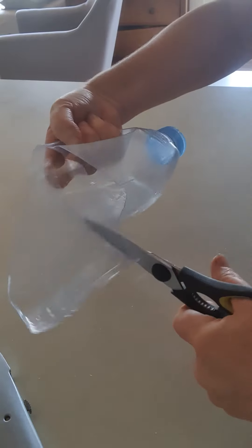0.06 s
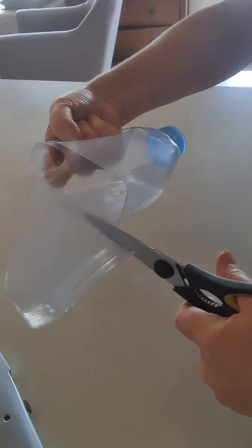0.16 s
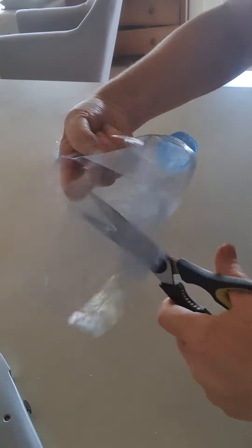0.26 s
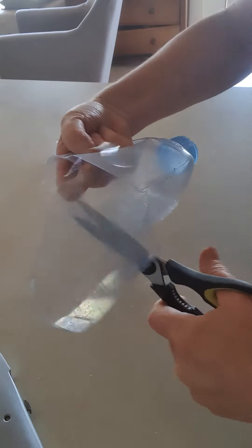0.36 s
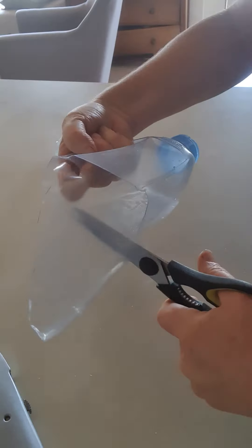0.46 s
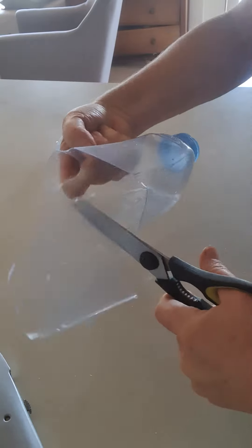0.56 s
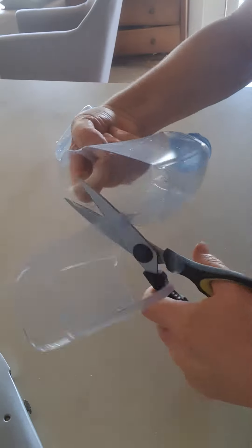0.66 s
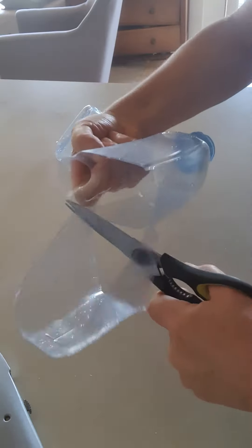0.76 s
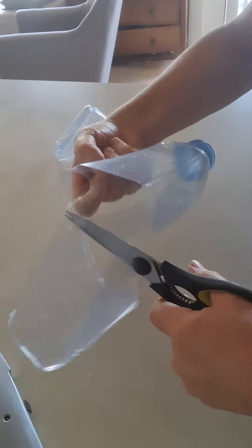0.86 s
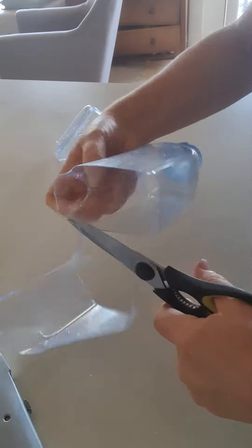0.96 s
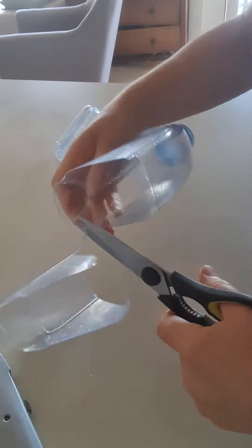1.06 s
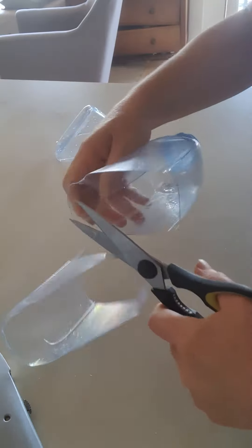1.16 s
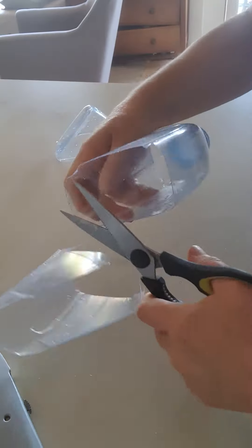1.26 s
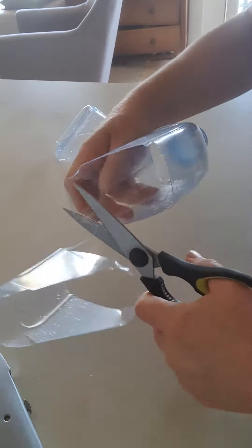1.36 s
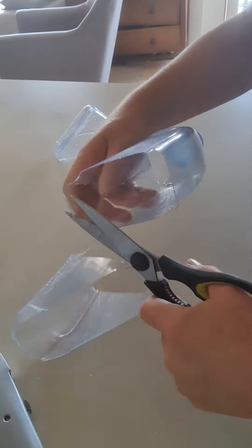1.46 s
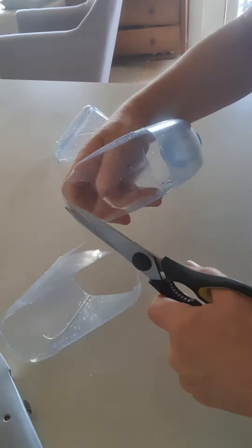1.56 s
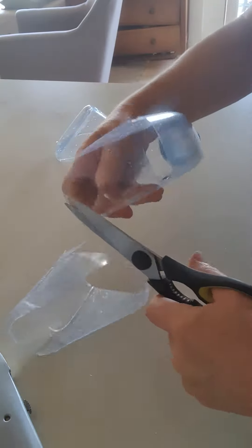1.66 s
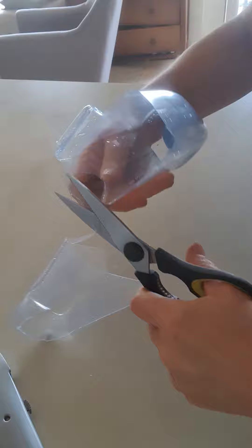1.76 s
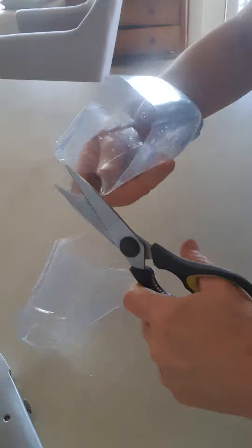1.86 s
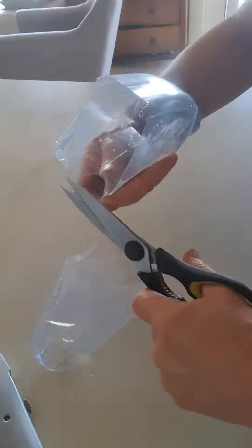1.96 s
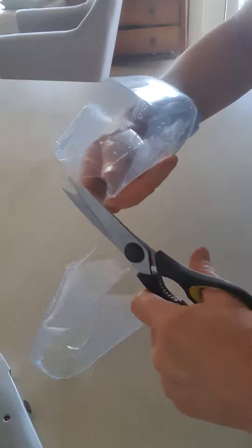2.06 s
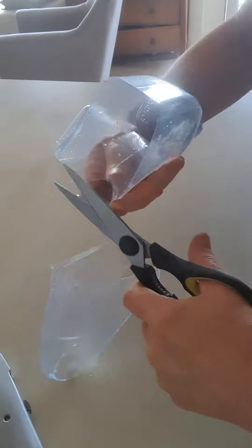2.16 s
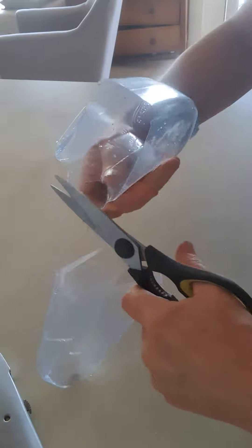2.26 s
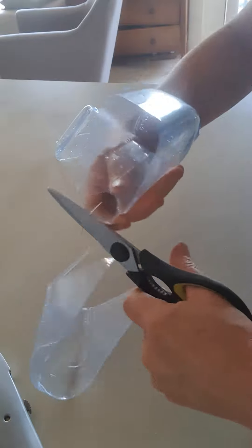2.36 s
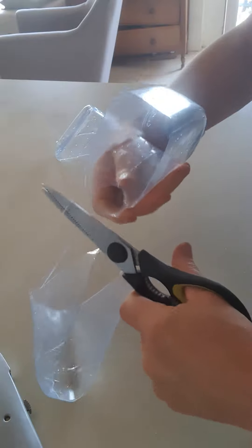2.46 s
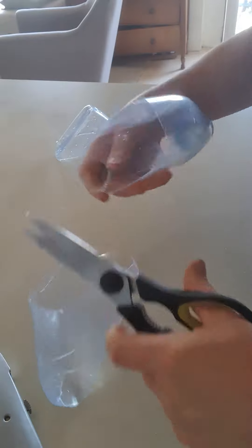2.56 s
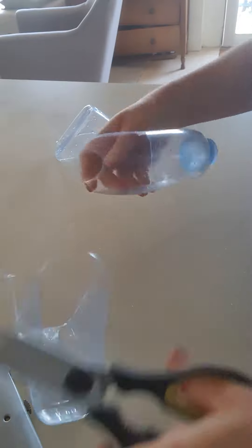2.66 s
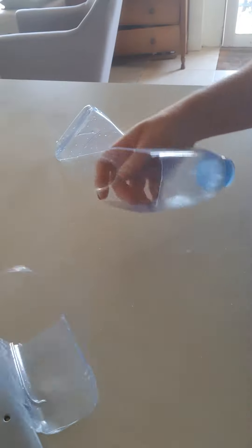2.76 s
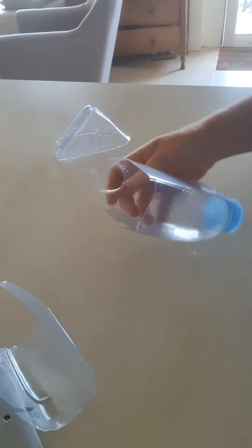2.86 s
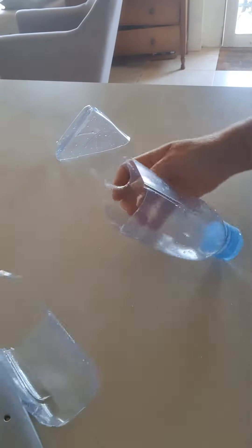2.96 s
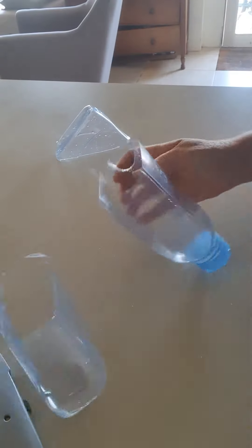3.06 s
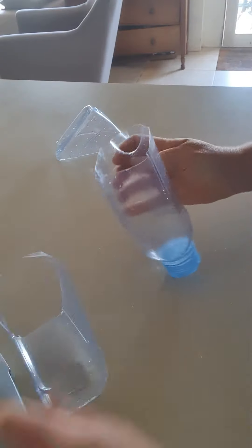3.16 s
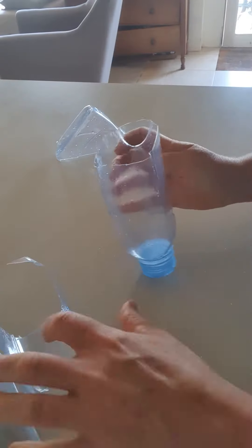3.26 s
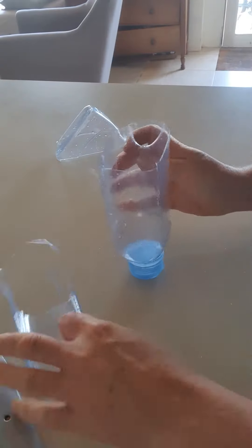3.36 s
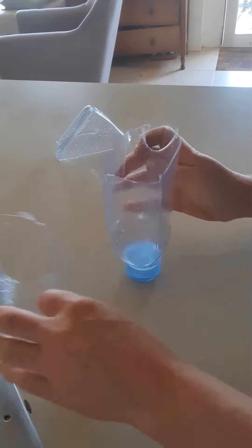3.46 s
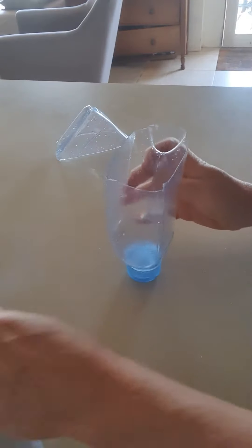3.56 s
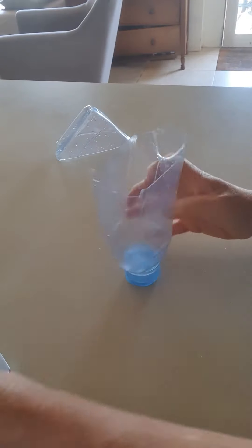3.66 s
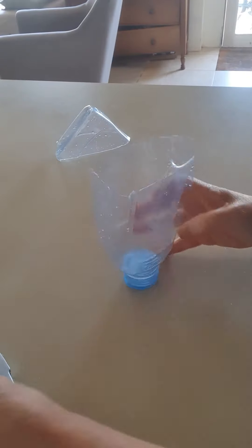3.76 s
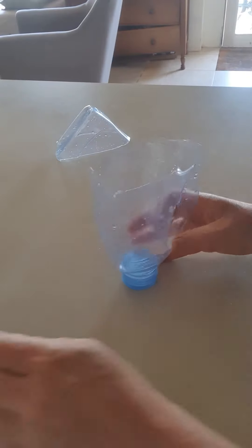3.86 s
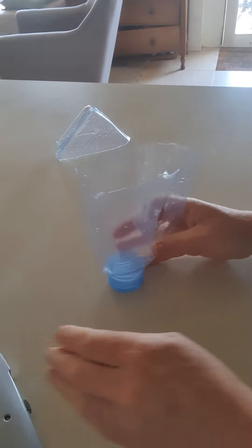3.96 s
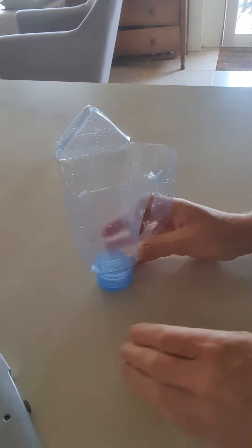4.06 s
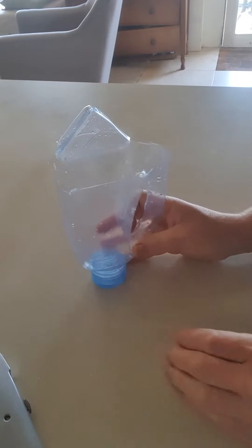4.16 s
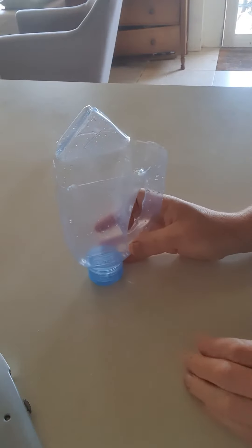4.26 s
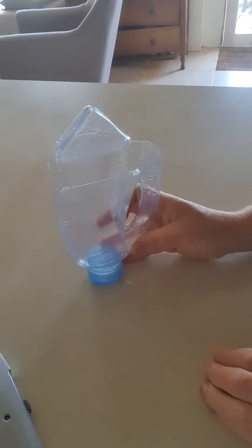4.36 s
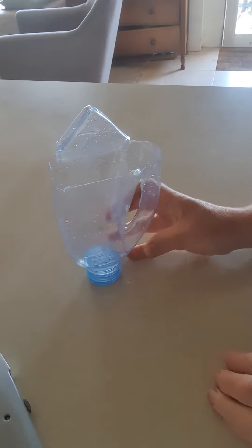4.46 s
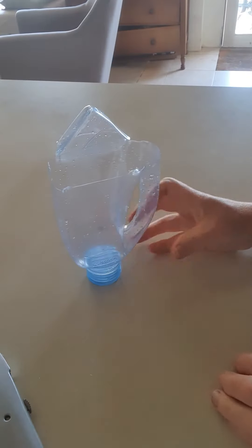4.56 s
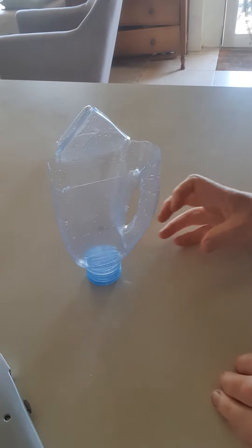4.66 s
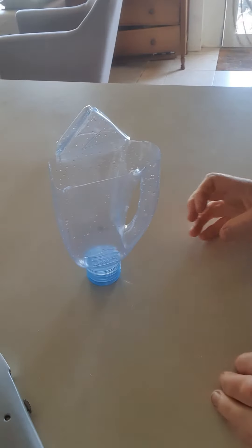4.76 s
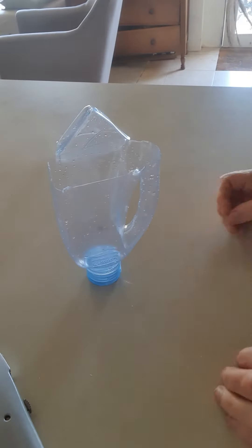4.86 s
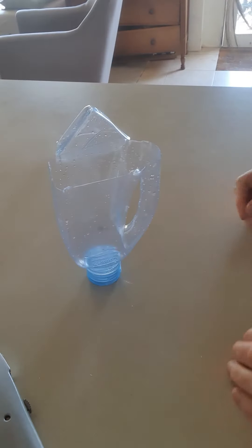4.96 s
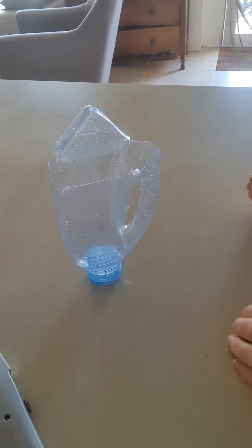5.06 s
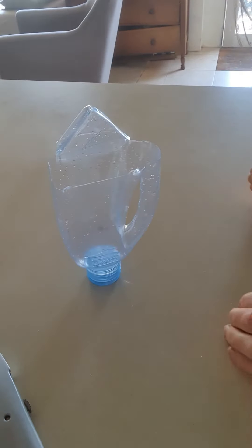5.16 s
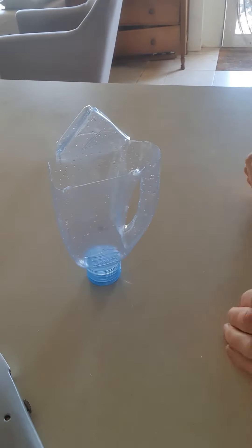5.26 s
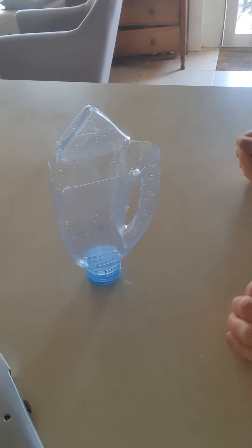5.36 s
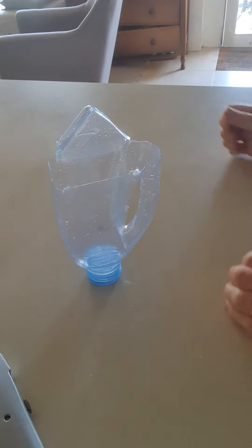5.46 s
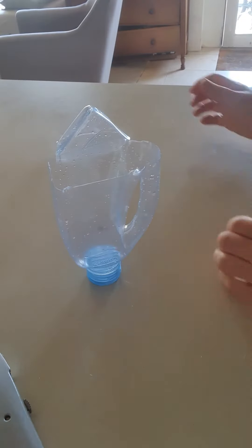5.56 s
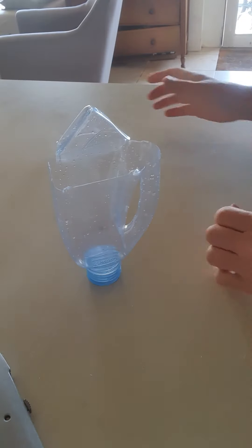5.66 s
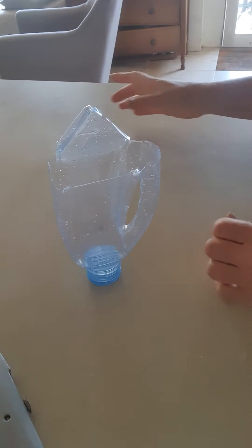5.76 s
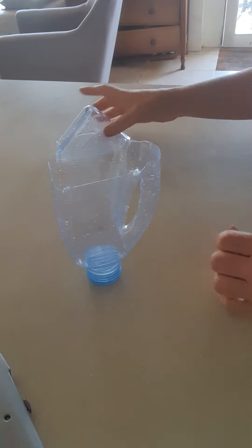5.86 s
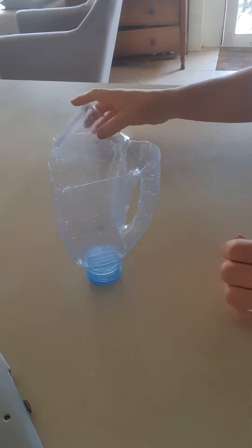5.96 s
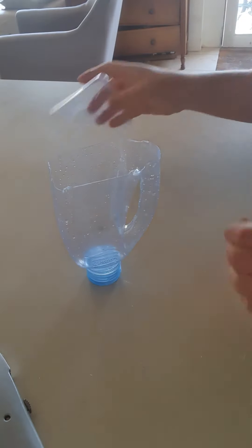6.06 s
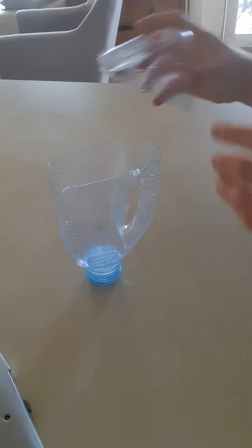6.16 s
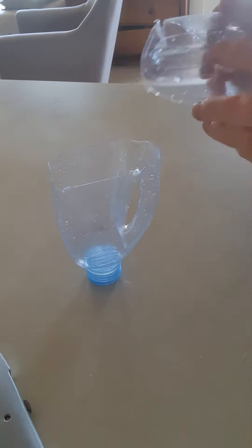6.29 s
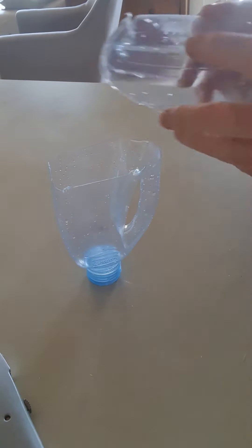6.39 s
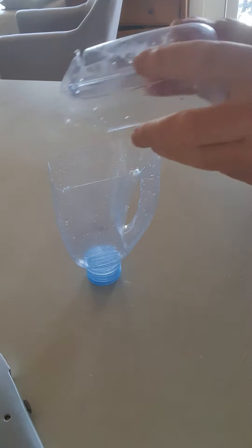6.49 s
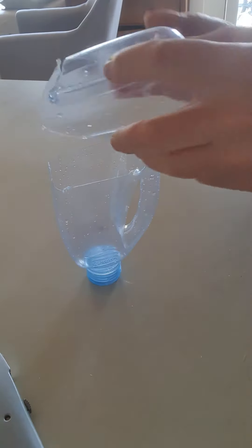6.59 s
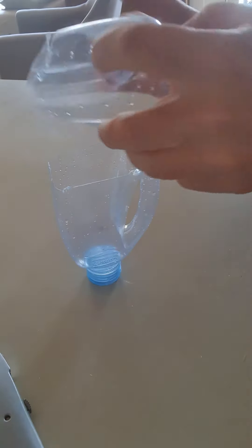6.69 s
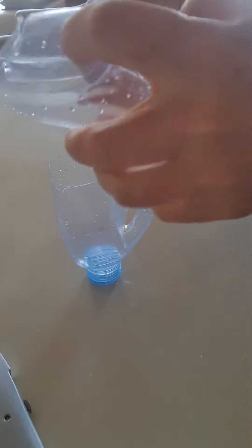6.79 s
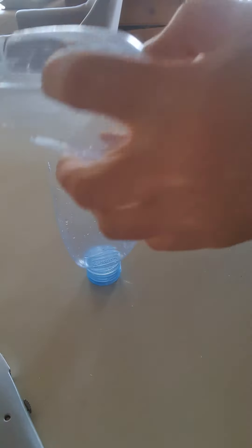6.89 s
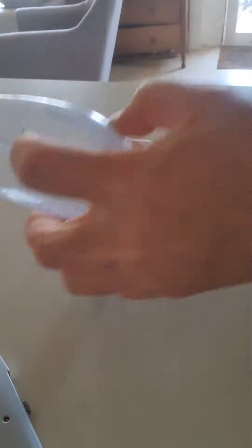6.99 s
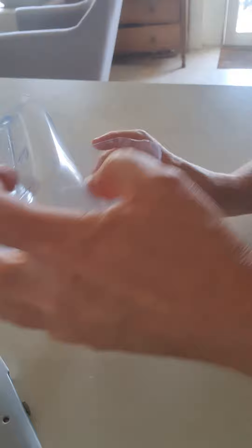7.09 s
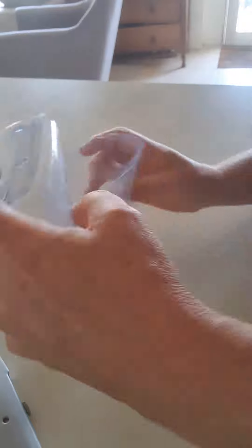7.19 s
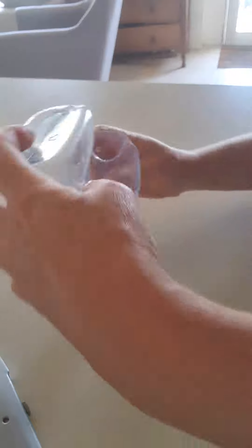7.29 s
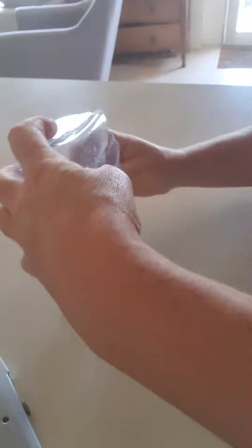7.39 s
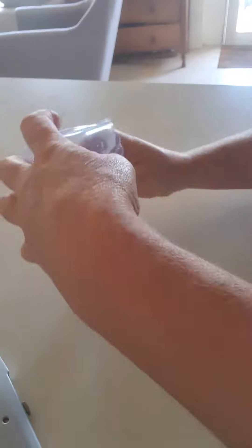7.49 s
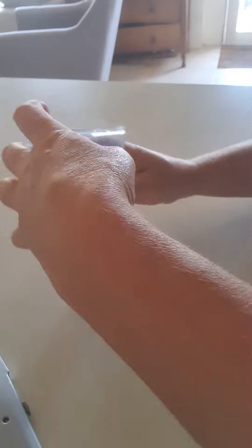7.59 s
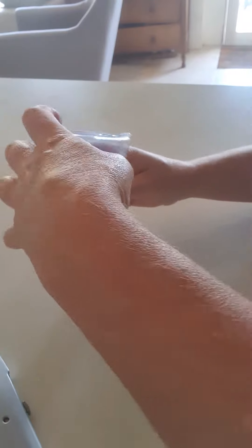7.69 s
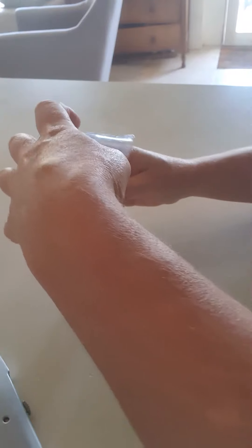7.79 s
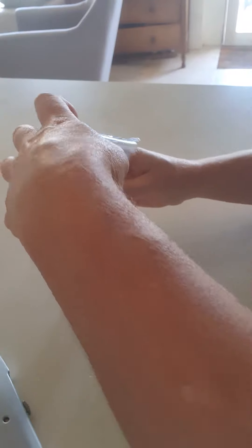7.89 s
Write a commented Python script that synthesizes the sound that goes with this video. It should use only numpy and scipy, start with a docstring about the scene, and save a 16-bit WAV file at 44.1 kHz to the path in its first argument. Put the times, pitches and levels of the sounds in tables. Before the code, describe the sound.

Close up in a small live room, scissors shear a thin plastic bottle in bursts of crackle, hollow pops and sharp ticks, gradually thinning out. The cut piece knocks and rattles on a tabletop, the other piece is set down with a few taps, then near quiet. Light touches follow, and finally plastic is bent by hand with dull pops. A very faint distant engine hums underneath.

```python
"""Scissors cut through a thin plastic bottle above a table, close to the microphones, in a small live room.
Each cut is a swell of tiny fractures that ends in snaps: hollow wall ring, panel crack and very short tick.
Panels pop through as short decaying sines; the offcut falls and bounces on the table in damped knocks
and noise-burst clicks, then the pieces are set down, picked up and bent by hand.
A distant engine drones underneath as two sines, with a rumble, a faint hiss and the room's air."""
import sys
import numpy as np
from scipy import signal
from scipy.fft import rfft, irfft, next_fast_len
from scipy.io import wavfile

SR = 44100
rng = np.random.default_rng(int(sys.argv[2]) if len(sys.argv) > 2 else 0)


def master_out(mix):
    """Clip the mix to full scale and print it as 16-bit PCM to the path in sys.argv[1]."""
    frames = np.transpose(np.atleast_2d(mix))
    ceiling = np.clip(frames, -1, 1)
    pcm = np.round(ceiling * 32767).astype(np.int16)
    wavfile.write(sys.argv[1], SR, pcm)


N = 349713

# the engine's deep note [start_s, level_db]
DRONE_LEVEL = [(1.5, -54), (3.5, -65.5), (3.9, -58), (5.7, -59), (6, -50.5), (7.1, -49), (7.3, -43)]
DRONE_HZ, OVERTONE_HZ = 52.4, 130.5
# a rumble whose pitch wanders, mostly downwards [start_s, pitch_hz, level_db]
RUMBLE_COURSE = [(0, 90, -54.5), (1.5, 97.2, -64.5), (2.7, 71.98, -56.5), (3.9, 69.75, -58.5),
                 (4.5, 63.25, -56.5), (7.9, 66.04, -62.5)]
# a faint high hiss while the hands withdraw [start_s, level_db] and its spectrum [frequency_hz, relative_db]
HISS_LEVEL = [(4.5, -100), (4.58, -61.5), (4.85, -61.5), (5.25, -76), (5.35, -63.5), (5.48, -86.5)]
HISS_SPECTRUM = [(2000, -35.5), (4000, -23), (5600, -3), (8400, -5.5), (13800, 3.5), (16000, -4)]
# spectrum of the room's air [frequency_hz, relative_db]
AIR_SPECTRUM = [(20, -11), (55, -4), (90, -9.5), (170, -12), (400, -25.5), (900, -30.5), (2000, -35.5),
                (4500, -39), (7000, -40), (16000, -42)]
AIR_DB = -66.5

# reverberation time of the room [frequency_hz, t60_s]
ROOM_T60 = [(100, 0.92), (1400, 0.37), (3700, 0.38), (9700, 0.19), (16000, 0.42)]
# resonances that the bottle and the blades lend to every fracture [pitch_hz, width_hz, gain_db]
BODY_RESONANCES = [(350, 20, 3), (653.8, 10, 4.5), (2230, 72, 4.5), (7560, 270, -0.5)]
# where the plastic is [start_s, left_delay_ms, left_right_db]
PLASTIC_PLACE = [(.3, 0.0077, 1), (1.1, 0.137, 0), (2.2, -0.08, 1), (2.3, -0.532, 1.5), (2.6, 0.0495, 0.5),
                 (2.9, 0.03, -0.5), (2.97, 0.305, -2.5), (3.28, 0.3, -3), (3.65, 0.25, -1.5), (4.8, 0.2, 0),
                 (6.3, -0.261, 3.5), (7.66, -0.232, -2)]
# response of the microphones in their housing [frequency_hz, gain_db, left_right_db]
MICROPHONE_PORTS = [(300, 0, -0.5), (510, 1, -1), (850, -1, -1.5), (1300, 1, 1), (2780, -2.5, 0.5),
                    (5000, 1.5, 2), (9880, 0.5, -1.5), (13580, -5, 2.5)]
EDGE_HZ = 16300  # upper band limit of the microphones

# the whole bottle flexes, or something bumps the table [start_s, level_db, pitch_hz]
FLEX_THUDS = [(.008, -35, 134.3), (0.724, -32.5, 94.4), (0.755, -30.5, 88.7), (2.295, -39.5, 94.7),
              (2.923, -32.5, 120.5), (3.004, -35.5, 137), (3.053, -31, 173.4), (3.103, -33, 155.4),
              (3.199, -40.5, 151), (3.685, -43.5, 150.5), (7.094, -41.5, 94.4), (7.329, -42, 164.5)]
# a stiff edge knocks on the table and swings a few times [start_s, level_db, pitch_hz]
EDGE_KNOCKS = [(2.92, -16, 835), (2.9507, -22.5, 890), (3.057, -33.5, 600)]
# a cut edge clicks on the table as the offcut tumbles [start_s, level_db, pitch_hz]
EDGE_CLICKS = [(2.92, -35.5, 3000), (2.967, -21.5, 7200), (3.0031, -23, 7147), (3.0247, -22, 6750),
               (3.0387, -28.5, 7500), (3.0642, -18.5, 6000), (3.085, -21.5, 7000), (3.1238, -26, 5900),
               (3.1988, -23.5, 6800), (3.2063, -29.5, 5440), (3.287, -36, 5770)]
# a panel of the wall pops through with a short clear note
# [start_s, level_db, pitch_hz, rise_s, decay_s, left_right_db]
PANEL_POPS = [(0.006, -19.5, 670, 0.00035, 0.0077, -8), (0.009, -16.5, 371, 0.0011, 0.012, -2),
              (0.014, -22.5, 490, 0.00064, 0.0043, 1.5), (0.203, -29.5, 647, 0.003, 0.0094, -12.5),
              (0.231, -28.5, 1452, 0.0051, 0.0092, -6.5), (0.236, -30, 557, 0.001, 0.0066, -1),
              (0.265, -23.5, 945, 0.005, 0.0066, 10.5), (0.372, -31, 980, 0.001, 0.005, 9),
              (0.439, -32, 330, 0.0046, 0.012, 0), (0.617, -25.5, 500, 0.0056, 0.0056, -0.5),
              (0.628, -30, 379, 0.00088, 0.0074, -2.5), (0.725, -26.5, 347, 0.005, 0.0098, 4),
              (0.749, -32.5, 344, 0.006, 0.008, 2.5), (0.979, -38.5, 1516, 0.0011, 0.0057, 2.5),
              (0.981, -31, 550, 0.00079, 0.0027, -1.5), (1.094, -31, 567, 0.0008, 0.011, 0),
              (1.095, -24.5, 781, 0.006, 0.0094, -6), (1.097, -26.5, 441, 0.0074, 0.013, 1),
              (1.135, -28.5, 775, 0.006, 0.008, -5), (1.158, -28, 406, 0.006, 0.008, 0.5),
              (1.449, -29, 1154, 0.001, 0.0074, -5.5), (1.507, -22, 660, 0.0063, 0.01, -19.5),
              (1.519, -29, 2210, 0.001, 0.004, 3.5), (1.522, -24, 370, 0.00087, 0.0063, -2.5),
              (1.54, -27.5, 680, 0.0046, 0.0074, -3), (1.665, -30, 697, 0.0026, 0.014, -0.5),
              (2.265, -41, 460, 0.004, 0.006, 0), (2.298, -34.5, 650, 0.001, 0.004, 2),
              (3.054, -25.5, 574, 0.0026, 0.014, -1.5), (3.104, -28, 595, 0.0072, 0.013, 0),
              (3.691, -29, 646.6, 0.0032, 0.021, -1), (3.812, -31.5, 703, 0.003, 0.014, 3.5),
              (7.094, -40, 1400, 0.001, 0.0044, 16), (7.328, -28.5, 651.3, 0.0009, 0.0027, -19.5),
              (7.432, -24, 490, 0.001, 0.0072, -0.5), (7.439, -28, 564, 0.001, 0.008, 1),
              (7.448, -28, 369, 0.0028, 0.012, -2), (7.462, -25, 507, 0.0011, 0.0063, 5),
              (7.469, -30, 628, 0.003, 0.011, 2), (7.515, -31.5, 540, 0.001, 0.0072, 3.5),
              (7.597, -29, 313, 0.001, 0.0073, 0.5), (7.603, -32, 486, 0.0014, 0.0045, 1.5),]
# under the fingers the bent wall sticks and slips in an even run of pops that swells and fades [pitch_hz]
SLIP_PITCHES = [552, 670]
SLIPS_PEAK_S, SLIP_PERIOD_S, SLIP_DECAY_S = 7.8728, 0.0183, 0.0033
SLIP_DB, SLIP_FADE_DB = -40, 4.28  # peak level; fall per squared step from the peak

# the small offcut's hollow note while it is picked up [start_s, end_s, pitch_hz, width_hz, added_db]
OFFCUT_RING = (5.85, 7.0, 1240, 338, 1)
# the wall's hollow ring follows the size and bend of the piece in play [start_s, pitch_hz, strength_db]
WALL_RING = [(.01, 456, -0.5), (.261, 1019, -7.5), (.44, 319.5, -5.5), (0.619, 480, -3.5), (.75, 345, 0.5),
             (1.1, 474, -6), (1.5, 654, -1.5), (2.1, 528, -7.5), (2.8, 654, -4.5), (3.1, 630, -1.5),
             (3.63, 550, -1), (3.8, 694, -2), (3.95, 517, -4), (4.6, 800, -4.5), (5.93, 551, -9),
             (6.25, 565, -7), (6.9, 560, -11), (7.1, 300, -1.5), (7.35, 664, 0.5), (7.46, 510, -4),
             (7.6, 477, -4), (7.8, 527, -10)]
WALL_SCATTER = 0.03  # random spread of the ring's pitch, as a ratio
# wall ring and tick of a snap and of a stroke of middling sharpness (dB re crack)
SNAP_RING_DB, SNAP_TICK_DB = -4.5, -7
STROKE_RING_DB, STROKE_TICK_DB = 4, -10
# a sharper sound has less wall ring and more tick (dB per dB of sharpness)
RING_FALL, TICK_RISE = 0.55, 0.76
CRACK_RISE = 0.022  # upward shift of the crack's band (octaves per dB of tick)
PANEL_RING = 0.6  # panels' ring beside the dry burst of a fracture (amplitude ratio)

# small random crinkles while the bottle is cut, handled or settling [start_s, end_s, base_level_db]
CRINKLE_SPANS = [(0.203, .53, -48.5), (0.651, 1.301, -47.5), (1.403, 2.449, -48), (2.6, 3.299, -47),
                 (3.697, 4.453, -60.5), (4.898, 5.801, -78)]
CRINKLE_HZ = 2200  # panel resonance of a middling crinkle
# the sheet cracks or buckles [start_s, level_db, panel_hz, sharpness_db]
SHEET_SNAPS = [(0.011, -20, 1267, 0), (0.029, -23.5, 3880, -10.5), (0.1715, -29, 2094, -6),
               (0.216, -25.5, 1907, -4.5), (0.2736, -21, 4940, -1), (0.3301, -33.5, 1178, -3.5),
               (0.37, -30, 1338, -9.5), (0.4601, -30.5, 2250, -2), (0.477, -35, 3810, 8),
               (0.611, -31.5, 1790, -7), (0.6328, -28.5, 3764, 6), (0.7265, -23.5, 1200, 0.5),
               (0.7469, -27, 1430, 8.5), (0.7593, -22, 3580, 3.5), (0.8042, -36.5, 2240, 12),
               (0.8218, -29.5, 2230, -4), (0.871, -40, 1206, 12), (0.912, -37, 1600, -4),
               (0.9773, -34, 1508, -18), (1.0676, -28.5, 1155, -6.5), (1.096, -24, 1650, -9.5),
               (1.1049, -27.5, 1680, -6.5), (1.174, -35, 2130, -4), (1.192, -40.5, 1300, -5),
               (1.2086, -32, 2160, -6), (1.395, -41, 1486, -6), (1.4502, -29, 1192, -9),
               (1.506, -26, 2930, -1), (1.518, -22, 1326, 2.5), (1.6149, -25, 1170, 1.5),
               (1.628, -35.5, 3630, -20.5), (1.685, -38.5, 3710, 7), (1.729, -32.5, 2220, -3),
               (1.863, -42.5, 4670, 1), (1.8812, -36, 2780, -5), (1.9437, -37.5, 3500, -12.5),
               (2.012, -44.5, 3660, -5.5), (2.0514, -38.5, 3440, 0.5), (2.06, -43.5, 1292, 0),
               (2.0912, -33, 1230, -1.5), (2.208, -41, 2153, -9.5), (2.2985, -20, 2954, 3.5),
               (2.624, -38.5, 3680, 12), (2.6411, -35, 1121, 9), (2.674, -40, 3300, 8),
               (2.7367, -32, 3500, 8.5), (2.751, -37, 1900, 5), (2.8279, -34.5, 1830, -6),
               (2.842, -37.5, 1856, -1.5), (3.699, -29.5, 3424, 2), (3.732, -33.5, 2347, -6),
               (4.212, -51, 3144, 3.5), (4.268, -46.5, 2500, -6.5), (4.615, -54, 3300, -0.5),
               (6.2297, -44.5, 1300, -8.5), (6.3119, -51, 1410, -6.5), (6.3926, -48, 1200, -5.5),
               (6.565, -56, 1292, -4.5), (7.0947, -41.5, 1410, -10), (7.227, -52, 1658, -6),
               (7.276, -42, 1660, -10), (7.328, -29, 2720, -4), (7.3643, -34, 1750, -3),
               (7.4307, -28.5, 1260, -13), (7.444, -28.5, 1310, -12.5), (7.5987, -34, 1300, -13.5),
               (7.661, -44, 4670, 13.5)]
# a piece bounces on the table, is set down or is touched [start_s, level_db, panel_hz, sharpness_db]
TABLE_TAPS = [(2.9198, -21.5, 1400, -8), (2.9501, -25, 1300, -15.5), (3.0028, -31, 1240, -7.5),
              (3.025, -25.5, 3550, -2.5), (3.056, -27, 1580, -19.5), (3.0644, -25, 4000, 0.5),
              (3.1056, -31, 1200, -27), (3.1242, -34.5, 1200, -14.5), (3.199, -34, 1900, 6.5),
              (3.2069, -32.5, 3233, -10), (3.617, -54.5, 1400, -32.5), (3.6855, -25.5, 2980, 5),
              (3.7547, -31.5, 3400, 4.5), (3.7921, -24.5, 3370, 4.5), (4.232, -35.5, 3408, -1),
              (4.5489, -42, 2830, -0.5), (4.7926, -53, 3340, 3), (5.768, -67, 3500, 2)]
# the sheet slides, rubs or creases [peak_s, length_s, level_db, panel_hz, sharpness_db]; level before the trim
SHEET_RUBS = [(3.122, .085, -33.5, 1200, -7.5), (3.251, 0.29, -42, 4800, 8),
              (3.63, 0.06, -47.5, 3420, -12.5), (3.696, 0.0559, -30.5, 2990, 7.5),
              (3.819, 0.0889, -31.5, 3260, 9), (3.965, 0.1545, -42, 2600, 4.5),
              (4.175, 0.468, -60, 1800, -3.5), (5.93, 0.0846, -53.5, 1049, -2),
              (6.154, 0.1336, -61, 3700, 12), (6.246, 0.0847, -43.5, 3890, 5.5),
              (6.469, 0.0822, -50.5, 3233, 8), (6.595, 0.26, -55.5, 2440, -1),
              (6.845, 0.32, -73.5, 1300, -16), (7.133, 0.2934, -51, 1600, 1.5),
              (7.367, 0.0952, -37.5, 1740, -4), (7.48, 0.1548, -41, 1400, -7.5),
              (7.594, 0.081, -40, 1300, -4), (7.852, 0.545, -60, 1456, 6)]
RUB_RISE_SHARE = 0.33  # share of a rub's length spent rising
# the held bottle rustles faintly as one long swell
# [peak_s, rise_s, fall_s, level_db, panel_hz, sharpness_db]; level before the trim
BOTTLE_HANDLING = (3, 6, 0.9676, -57, 1997, 9.5)
# a blade shears the sheet [peak_s, rise_s, fall_s, level_db, panel_hz, sharpness_db]; level before the trim
BLADE_CUTS = [(0.014, 0.009, 0.00776, -20.5, 1300, 4), (0.039, 0.00948, 0.047, -35, 1963, 4.5),
              (0.258, 0.0858, 0.02242, -27, 2144, -2.5), (0.445, 0.0624, 0.0228, -44.5, 1043, -17.5),
              (0.628, 0.0516, 0.0122, -33, 1836, 0), (0.734, 0.01098, 0.041, -39.5, 1200, -16.5),
              (0.851, 0.0692, 0.1414, -40.5, 1459, 3.5), (0.99, 0.0488, 0.172, -49, 1480, -10),
              (1.098, 0.019, 0.0148, -25.5, 1675, -3.5), (1.165, 0.062, 0.041, -35, 2122, 10),
              (1.275, 0.02445, 0.0279, -37, 3500, 6), (1.395, 0.016, 0.056, -43, 1460, 0),
              (1.52, 0.0364, 0.02157, -24.5, 1330, 1.5), (1.675, 0.055, 0.062, -37, 2140, -8),
              (2.11, 0.0615, 0.0399, -33.5, 1210, 2), (2.336, 0.00879, 0.082, -33, 3073, 3.5),
              (2.65, 0.0698, 0.1797, -39.5, 1020, 1.5)]
STROKE_TRIM_DB = -1.5  # common trim of cuts, rubs and handling


def gain_of(db):
    """Level definition: an amplitude ratio is ten to the power of dB / 20."""
    return 10 ** (np.asarray(db) / 20)


def unit(x):
    """Energy normalisation: each channel is scaled to energy 1."""
    return x / np.sqrt(np.sum(x ** 2, axis=-1, keepdims=True) + 1e-30)


def evened(x):
    """Power normalisation: each channel is scaled to rms 1."""
    return unit(x) * np.sqrt(x.shape[-1])


def read(points, hz):
    """Spectral interpolation: a value is read linearly along a logarithmic frequency axis."""
    f, value = np.transpose(points)
    return np.interp(np.log(hz + 1), np.log(f + 1), value)


def follow(rows):
    """Slow modulation: each column of a curve is interpolated at every sample."""
    s, *columns = np.transpose(rows)
    return [np.interp(np.arange(N) / SR, s, column) for column in columns]


def add(mix, s, sound):
    """Superposition: a sound is added to the mix from time s."""
    part = mix[:, max(0, round(s * SR)):][:, :sound.shape[1]]
    part += sound[:, :part.shape[1]]


def band(x, lo_hz, hi_hz, order=2):
    """Band limitation by a causal band-pass filter."""
    sos = signal.butter(order, [lo_hz, min(hi_hz, 0.49 * SR)], "band", fs=SR, output="sos")
    return signal.sosfilt(sos, x)


def resonate(x, hz, width):
    """Resonance: a single second-order mode with peak gain 1."""
    b, a = signal.iirpeak(hz, max(hz / width, 1), fs=SR)
    return signal.lfilter(b, a, x)


def noise_pair(count, alike):
    """Partial coherence: two microphones share a fraction of the power of their white noise."""
    shared, *own = rng.standard_normal((3, count))
    alike = np.clip(alike, 0, 1)
    return np.sqrt(alike) * shared + np.sqrt(1 - alike) * np.array(own)


def coloured(points, alike):
    """Spectral shaping: white noise is weighted in frequency to give steady coloured noise."""
    spectrum = rfft(noise_pair(N, alike))
    return evened(irfft(spectrum * gain_of(read(points, np.fft.rfftfreq(N, 1 / SR))), N))


def background(overtone_db=-21, waver_hz=0.25):
    """Sustained sources: a wavering two-tone drone, narrow-band rumble, faint hiss and the room's air."""
    t = np.arange(N) / SR
    knots = np.arange(0, 9, 1 / 24)
    drift, real, imaginary = (np.interp(t, knots, k) for k in rng.standard_normal((3, len(knots))))
    turns = np.cumsum(DRONE_HZ + waver_hz * drift) / SR
    overtone = np.sin(2 * np.pi * turns * OVERTONE_HZ / DRONE_HZ)
    note = np.sin(2 * np.pi * turns) + gain_of(overtone_db) * overtone
    drone = gain_of(follow(DRONE_LEVEL)[0]) * evened(note)
    # a slow random complex envelope on a gliding carrier makes the rumble
    hz, db = follow(RUMBLE_COURSE)
    carrier = np.exp(2j * np.pi * np.cumsum(hz) / SR)
    rumble = gain_of(db) * evened(((real + 1j * imaginary) * carrier).real)
    hiss = gain_of(follow(HISS_LEVEL)[0]) * coloured(HISS_SPECTRUM, alike=0.4)
    air = gain_of(AIR_DB) * coloured(AIR_SPECTRUM, alike=0.33)
    return drone + rumble + hiss + air


def room(x, early_db=-7, late_db=-5, early_s=0.006, build_s=0.005):
    """Reverberation: quick reflections off the table and the hands, then the diffuse tail of a tiled room."""
    t = np.arange(SR * 2 // 3) / SR
    taps = rng.standard_normal((2, len(t))) * (rng.random((2, len(t))) < 0.08)
    early = unit(taps * np.exp(-t / early_s) * (t > 0.002))
    hz, when, z = signal.stft(noise_pair(len(t), 0.034), SR, nperseg=256)
    # the long waves reach both microphones alike
    z = z + (z[::-1] - z) * 0.5 / (1 + (hz[:, None] / 550) ** 4)
    z *= gain_of(-60 * when / read(ROOM_T60, hz)[:, None])
    late = signal.istft(z, SR, nperseg=256)[1][:, :len(t)] * np.clip(t / build_s - 0.5, 0, 1)
    # the tail is normalised by its energy between 1 and 5 kHz
    late = late / np.linalg.norm(band(late, 1000, 5000), axis=1, keepdims=True) * np.sqrt(8000 / SR)
    return signal.fftconvolve(x, gain_of(early_db) * early + gain_of(late_db) * late, axes=1)[:, :N]


def placed(s, pair):
    """Stereo localisation: time and level differences set where the plastic is at time s."""
    when, lag_ms, pan_db = np.transpose(PLASTIC_PLACE)
    lag = round(np.interp(s, when, lag_ms) * SR / 1000)
    sides = gain_of(np.array([[0.5], [-0.5]]) * np.interp(s, when, pan_db))
    delayed = np.array([np.roll(pair[0], max(lag, 0)), np.roll(pair[1], max(-lag, 0))])
    return delayed * sides / np.sqrt(np.mean(sides ** 2))


def thuds(t60=0.11, rough=0.8):
    """Free damped vibration: a low swing decays exponentially with a dull noise puff around it."""
    out, t = np.zeros((2, N)), np.arange(SR // 4) / SR
    for s, db, hz in FLEX_THUDS:
        swing = band(np.sin(2 * np.pi * hz * t) * gain_of(-60 * t / t60), 44, 370)
        puff = band(noise_pair(len(t), 0.94) * np.exp(-t / 0.0089), 69, 210)
        add(out, s, gain_of(db) * np.sqrt(SR / 100) * unit(unit(swing) + rough * unit(puff)))
    return out


def knocks(q=3.5, top_hz=3000):
    """Impulse response of a heavily damped mode: the plastic edge swings alike at both microphones."""
    out, blow = np.zeros((2, N)), signal.unit_impulse(SR // 40)
    for s, db, hz in EDGE_KNOCKS:
        swing = unit(band(resonate(blow, hz, hz / q), 450, top_hz))
        add(out, s, gain_of(db) * np.sqrt(SR / 100) * swing[None])
    return out


def clicks(decay_s=0.0009, rise_s=0.0003, q=5, ring=0.6, lowest_share=0.6):
    """Hard contact: an edge on the table gives a burst of about a millisecond with one high resonance."""
    out, t = np.zeros((2, N)), np.arange(SR // 50) / SR
    for s, db, hz in EDGE_CLICKS:
        envelope = np.exp(-t / decay_s) * (1 - np.exp(-t / rise_s))
        burst = band(noise_pair(len(t), 0.29) * envelope, lowest_share * hz, EDGE_HZ)
        click = unit(unit(burst) + ring * unit(resonate(burst, hz, hz / q)))
        add(out, s, placed(s, gain_of(db) * np.sqrt(SR / 100) * click))
    return out


def pops(bend=0.03, spread=0.23, slip_rise_s=0.00064):
    """Snap-through and stick-slip: panels flip or slip; each note starts a little sharp and dies quickly."""
    out, t = np.zeros((2, N)), np.arange(SR // 8) / SR
    slips = [(SLIPS_PEAK_S + k * SLIP_PERIOD_S, SLIP_DB - SLIP_FADE_DB * k ** 2, hz, slip_rise_s, SLIP_DECAY_S, 0)
             for k in range(-3, 3) for hz in SLIP_PITCHES]
    side = np.array([[1], [-1]])
    for s, db, hz, rise, decay, pan_db in PANEL_POPS + slips:
        fade, sides = np.exp(-t / decay), gain_of(side * pan_db / 2)
        turns = np.cumsum(hz * (1 + bend * (fade - 0.5))) / SR
        swing = np.sin(2 * np.pi * turns + side * spread * rng.standard_normal())
        note = unit(swing * fade * (1 - np.exp(-t / rise)))
        add(out, s, gain_of(db) * np.sqrt(SR / 100) * note * sides / np.sqrt(np.mean(sides ** 2)))
    return out


def body(x):
    """Coupled resonance: the modes of bottle and blades ring on after each fracture."""
    return x + sum((gain_of(db) - 1) * resonate(x, hz, width) for hz, width, db in BODY_RESONANCES)


def small_piece(x):
    """Sympathetic resonance: the small offcut rings along with whatever touches it."""
    start, end, hz, width, db = OFFCUT_RING
    t = np.arange(N) / SR
    return x + gain_of(db) * resonate(x * ((t > start) & (t < end)), hz, width)


def shiver(power, decay_s, alike, rise_s=0.00092):
    """Dense vibration: every fracture starts a noise burst whose energy decays with time constant decay_s."""
    t = np.arange(SR // 25) / SR
    energy = signal.oaconvolve(power, np.exp(-t / decay_s) * (1 - np.exp(-t / rise_s)))[:len(power)]
    return unit(noise_pair(len(power), alike) * np.sqrt(abs(energy)))


def panel_modes(jerks, count=16, lo_hz=950, hi_hz=6000, top_decay_s=0.0023, scatter=0.08, uneven_db=3,
                spread=0.76):
    """Modal superposition: each bend of the sheet has its own modes, rung alike by every fracture there."""
    t, side = np.arange(SR // 25) / SR, np.array([[1], [-1]])
    ring = np.zeros((2, len(t)))
    modes = rng.standard_normal((count, 4))
    for hz, (detune, size, phase, apart) in zip(np.geomspace(lo_hz, hi_hz, count), modes):
        swing = np.sin(2 * np.pi * (hz * np.exp(scatter * detune) * t + phase) + side * spread * apart)
        # lower modes die away more slowly
        decay_s = top_decay_s * np.sqrt(hi_hz / hz)
        ring += gain_of(uneven_db * size) * np.sqrt(hz) * swing * np.exp(-t / decay_s)
    return unit(signal.oaconvolve(jerks[None], ring, axes=1)[:, :len(jerks)])


def colour(s, sharp_db, ring_db, tick_db):
    """Spectral balance: sharpness trades wall ring for tick; the piece in play sets the ring's pitch."""
    when, hz, strength_db = np.transpose(WALL_RING)
    ring_db = ring_db + np.interp(s, when, strength_db) - RING_FALL * sharp_db
    ring_hz = np.interp(s, when, hz) * np.exp(WALL_SCATTER * rng.standard_normal())
    return ring_db, ring_hz, tick_db + TICK_RISE * sharp_db


def sheet(s, power, db, crack_hz, ring_db, ring_hz, tick_db, unpitched=1.9):
    """Response of a thin shell: fractures excite a wall ring, a crack that rings its panels, and a tick."""
    power = np.pad(power, (0, SR // 12))
    # each fracture also jerks the wall as a whole, inwards or outwards
    jerks = unit(np.sqrt(power) * rng.choice([-1, 1], len(power)))
    wall = band(0.75 * jerks + shiver(power, decay_s=0.0069, alike=0.8), 230, 960, order=3)
    wall = unit(unpitched * unit(wall) + unit(resonate(wall, ring_hz, width=190)))
    # more tick raises the whole band of the crack
    lift = 2 ** (CRACK_RISE * tick_db)
    burst = unit(0.67 * jerks + shiver(power, decay_s=0.0013, alike=0.4))
    crack = band(burst + PANEL_RING * panel_modes(jerks), 1020 * lift, 4700 * lift, order=3)
    panel = resonate(crack, crack_hz, width=0.24 * crack_hz)
    crack = unit(unit(crack) + 0.78 * unit(panel))
    tick = band(shiver(power, decay_s=0.0007, alike=0.19), 5200, 15000, order=3)
    # the sharper the snap, the further its tick reaches into the top octave
    tick = unit(unit(band(tick, 3600, 7800)) + gain_of(6.5 + 0.21 * tick_db) * unit(tick))
    layers = crack + gain_of(ring_db) * wall + gain_of(tick_db) * tick
    return placed(s, gain_of(db) * np.sqrt(power.sum()) * layers)


def crinkles(per_s=22, spread_db=4.5, variety_db=7):
    """Random point process: dull, middling and sharp small snaps; sharper ones ring smaller panels."""
    out, blow = np.zeros((2, N)), SR / 100
    chance, size = rng.random(N), np.minimum(rng.exponential(1, N), 3)
    kind = rng.choice([-1, 0, 1], N)
    power = blow * (chance < per_s / SR) * gain_of(spread_db * size) ** 2
    for start, end, db in CRINKLE_SPANS:
        for k in (-1, 0, 1):
            tone = colour((start + end) / 2, k * variety_db, SNAP_RING_DB, SNAP_TICK_DB)
            part = (power * (kind == k))[round(start * SR):round(end * SR)]
            add(out, start, sheet(start, part, db, CRINKLE_HZ * 2 ** (k / 2), *tone))
    return out


def snaps():
    """Impulsive excitation: single fractures and taps; a level is the crack's energy over 10 ms."""
    out, blow = np.zeros((2, N)), np.array([SR / 100])
    for s, db, hz, sharp_db in SHEET_SNAPS + TABLE_TAPS:
        tone = colour(s, sharp_db, SNAP_RING_DB, SNAP_TICK_DB)
        add(out, s, sheet(s, blow, db, hz, *tone, unpitched=1.3))
    return out


def swells():
    """Sustained excitation: cuts, rubs and the faint handling, each with its shape and spectral balance."""
    rubs = [(s, RUB_RISE_SHARE * length, (1 - RUB_RISE_SHARE) * length, *rest)
            for s, length, *rest in SHEET_RUBS]
    return [(s, *shape, *colour(s, sharp_db, STROKE_RING_DB, STROKE_TICK_DB))
            for s, *shape, sharp_db in [*BLADE_CUTS, *rubs, BOTTLE_HANDLING]]


def strokes(grains_per_s=220, spread_db=2.5, steepness=1.7, rub=0.0011, sag=0.08):
    """Progressive fracture: a swell of tiny fractures of uneven size over a little smooth rubbing."""
    out = np.zeros((2, N))
    chance, size = rng.random(N), np.minimum(rng.exponential(1, N), 4)
    grains = (chance < grains_per_s / SR) * gain_of(spread_db * size) ** 2 + rub
    for peak, rise, fall, db, crack_hz, ring_db, ring_hz, tick_db in swells():
        at = np.arange(max(0, round((peak - rise) * SR)), min(N, round((peak + fall) * SR)))
        pressure = np.interp(at / SR, [peak - rise, peak, peak + fall], [0, 1, 0]) ** steepness
        power = pressure * grains[at]
        power *= pressure.sum() / power.sum()
        # the stroke passes three panels in turn, each a little larger and lower than the last
        panel = np.round(1 - 2 * np.cumsum(pressure) / pressure.sum())
        for k in (1, 0, -1):
            shift, part = np.exp(k * sag), panel == k
            sound = sheet(peak, power[part], db, crack_hz * shift, ring_db, ring_hz * shift, tick_db,
                          unpitched=1.0)
            add(out, at[part][0] / SR, sound)
    return out


def scene():
    """Superposition of direct and reverberant sound: plastic, close impacts, their room, the background."""
    fractures = snaps() + gain_of(STROKE_TRIM_DB) * strokes() + crinkles()
    plastic = body(small_piece(fractures)) + thuds()
    # these reach the microphones straight, without the body resonances, and excite the room 3 dB less
    close = knocks() + clicks() + pops()
    return plastic + close + room(plastic + gain_of(-3.0) * close) + background()


def record(dry):
    """Transducer response: the colour of each microphone, full-scale clipping, then the band limit."""
    size = next_fast_len(N + SR, True)
    hz, ports = np.fft.rfftfreq(size, 1 / SR), np.array(MICROPHONE_PORTS)
    balance_db = np.array([[0.5], [-0.5]]) * read(ports[:, ::2], hz)
    db = read(ports[:, :2], hz) + balance_db
    heard = np.clip(irfft(rfft(dry, size) * gain_of(db), size)[:, :N], -1, 1)
    low_pass = signal.firwin(255, EDGE_HZ, window=("kaiser", 8), fs=SR)
    return signal.oaconvolve(heard, low_pass[None], "same")


dry = scene()
out = record(dry)
master_out(out)
```